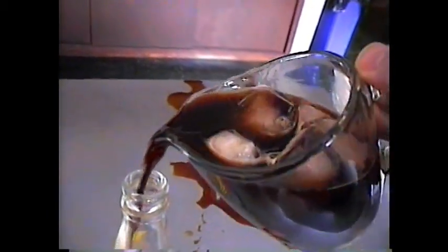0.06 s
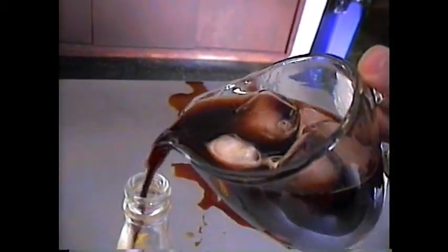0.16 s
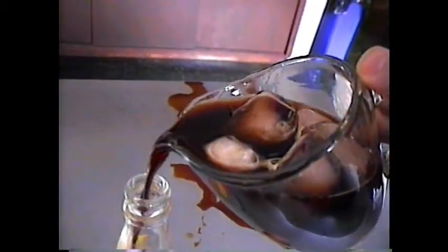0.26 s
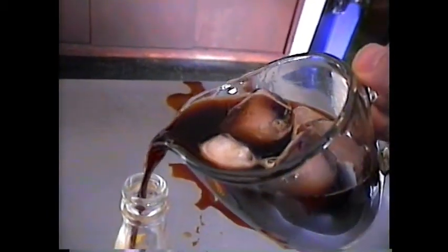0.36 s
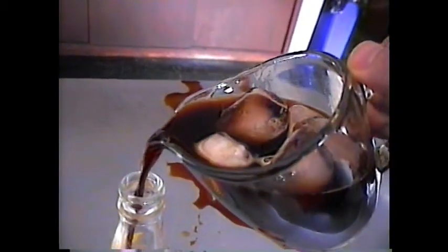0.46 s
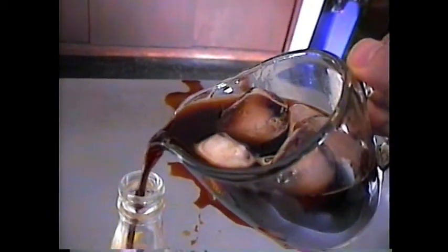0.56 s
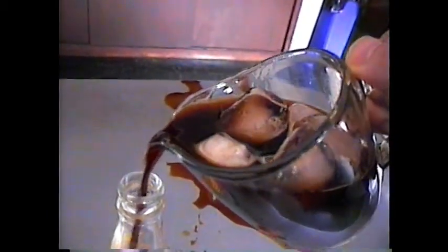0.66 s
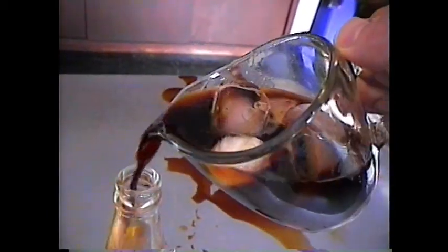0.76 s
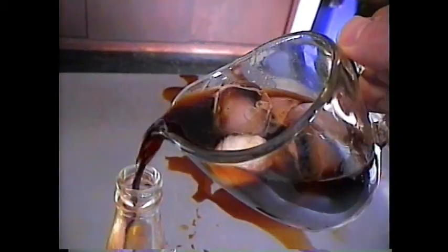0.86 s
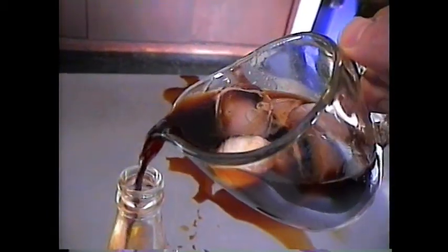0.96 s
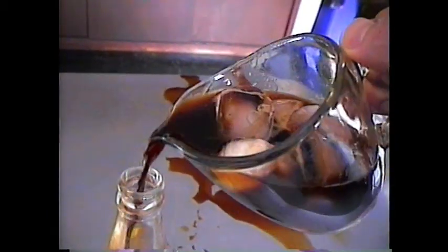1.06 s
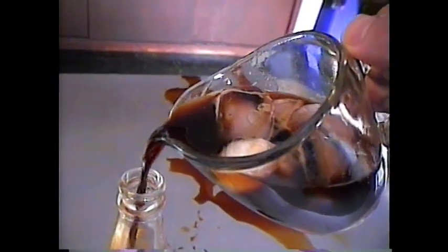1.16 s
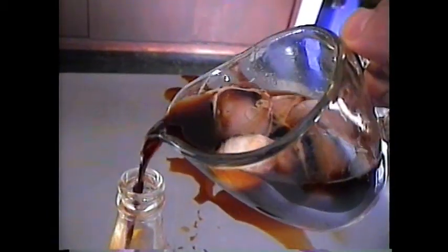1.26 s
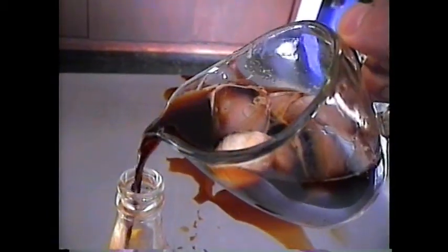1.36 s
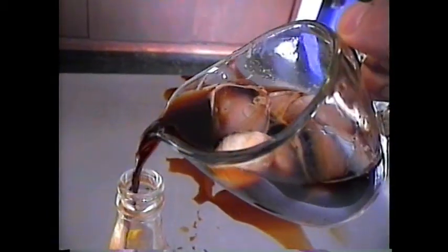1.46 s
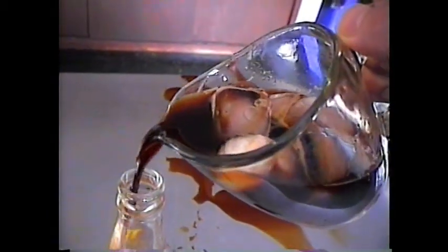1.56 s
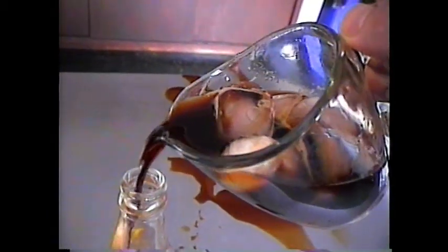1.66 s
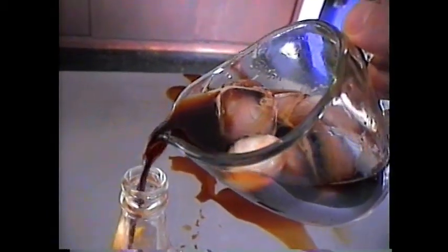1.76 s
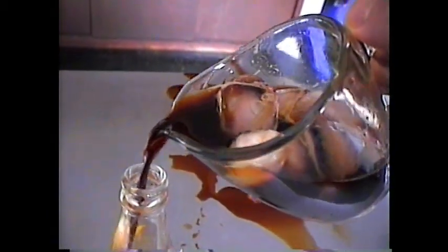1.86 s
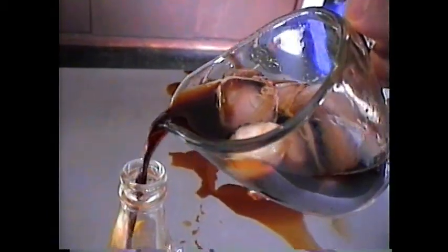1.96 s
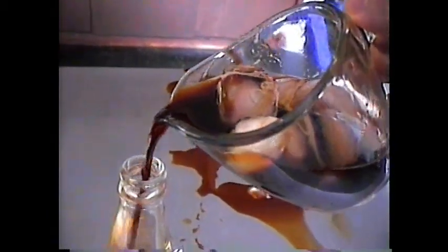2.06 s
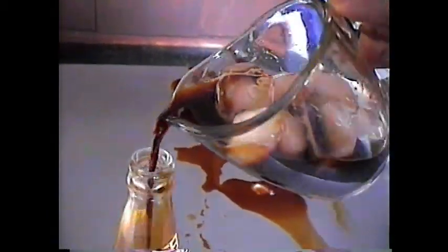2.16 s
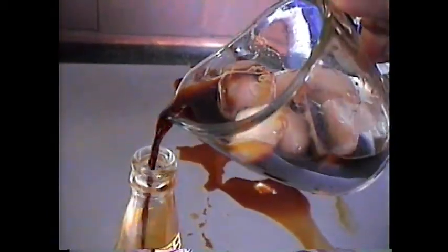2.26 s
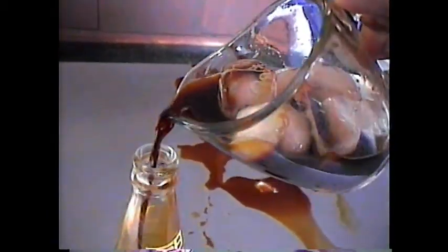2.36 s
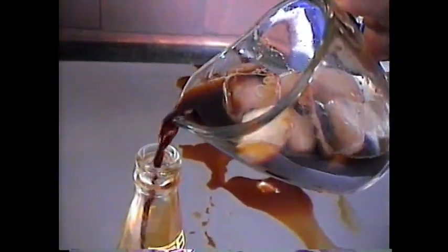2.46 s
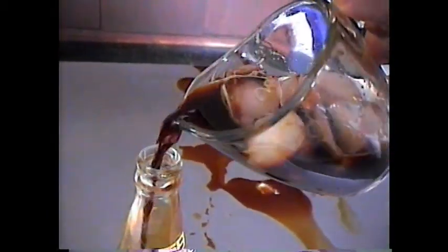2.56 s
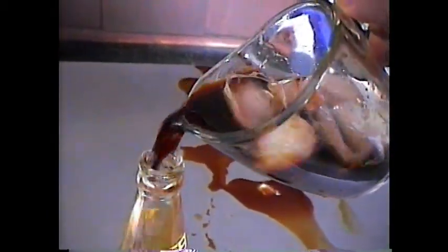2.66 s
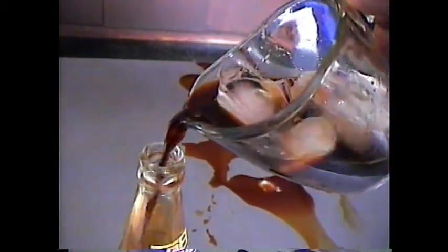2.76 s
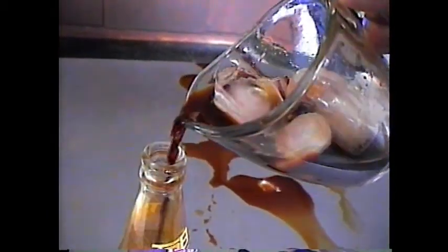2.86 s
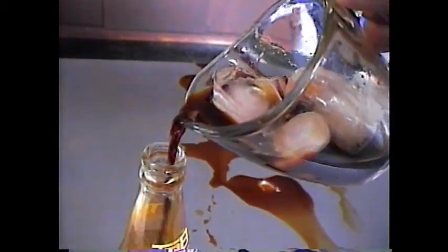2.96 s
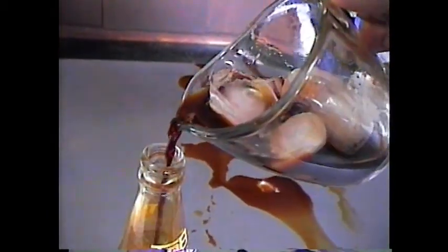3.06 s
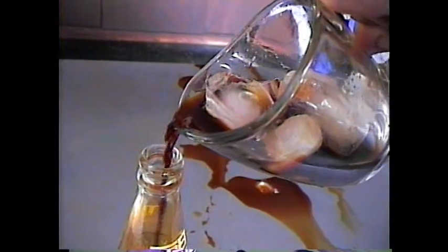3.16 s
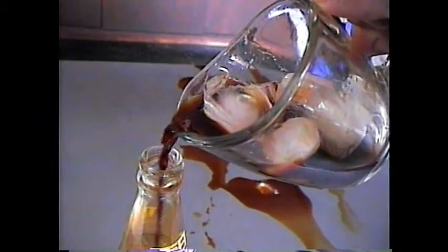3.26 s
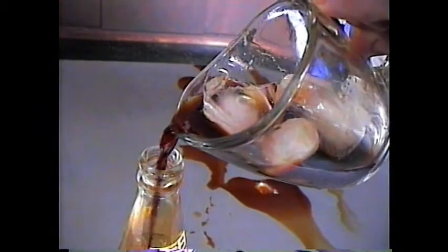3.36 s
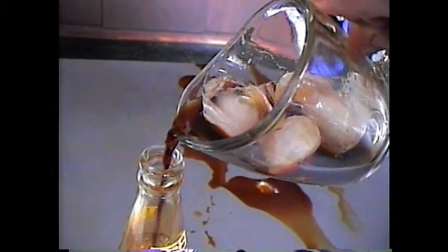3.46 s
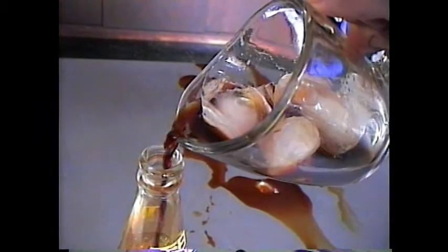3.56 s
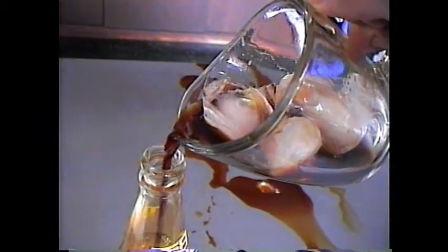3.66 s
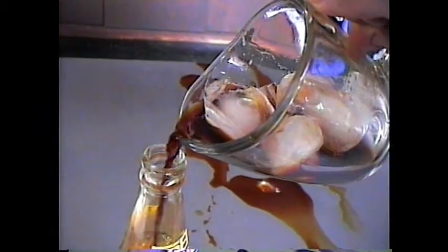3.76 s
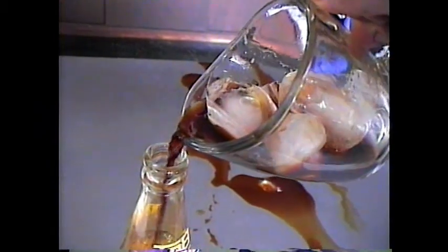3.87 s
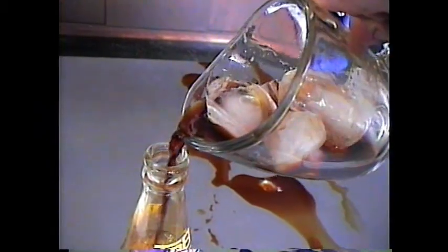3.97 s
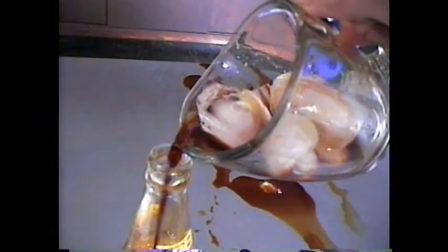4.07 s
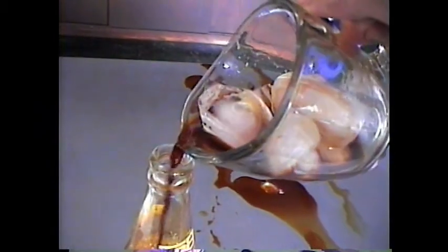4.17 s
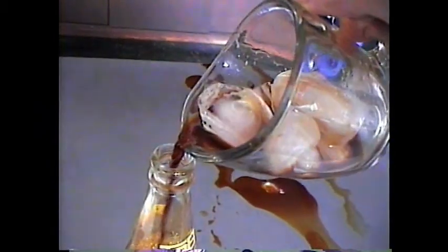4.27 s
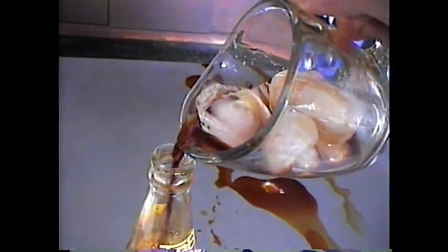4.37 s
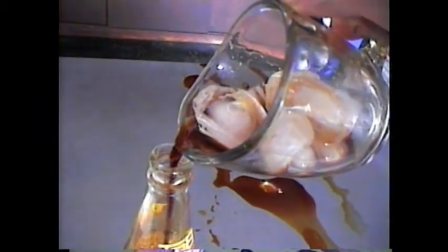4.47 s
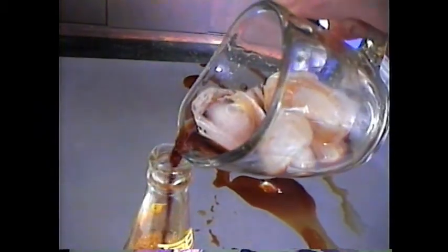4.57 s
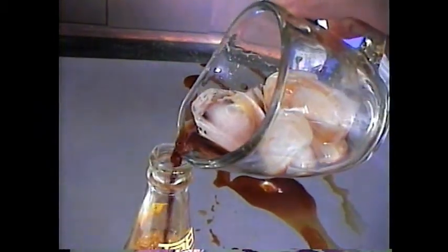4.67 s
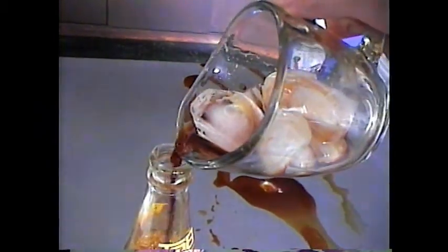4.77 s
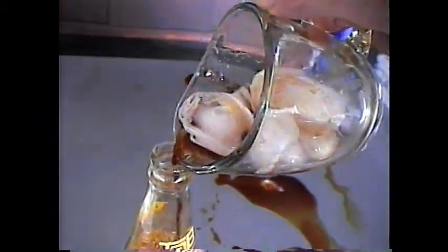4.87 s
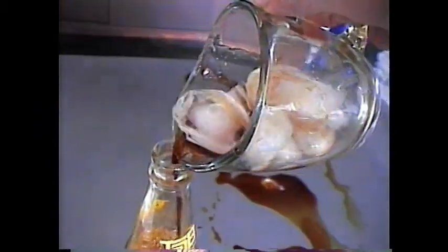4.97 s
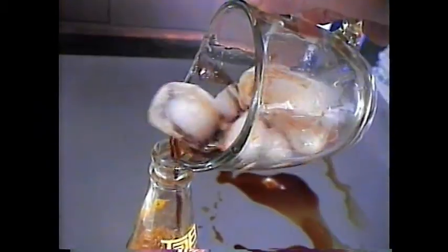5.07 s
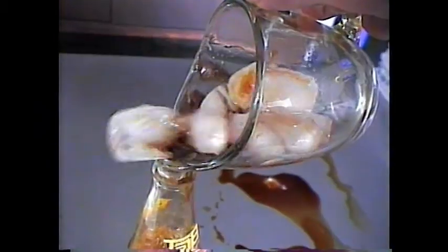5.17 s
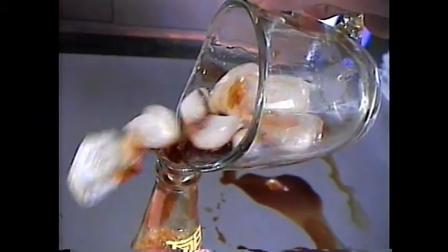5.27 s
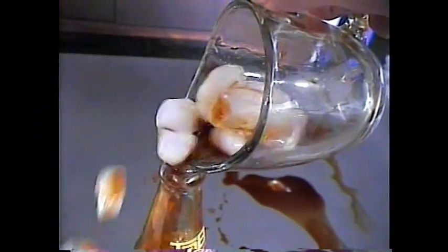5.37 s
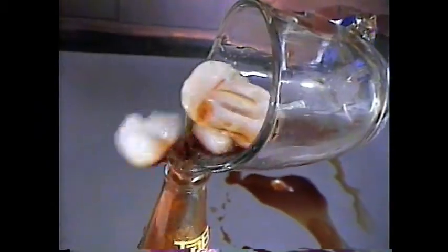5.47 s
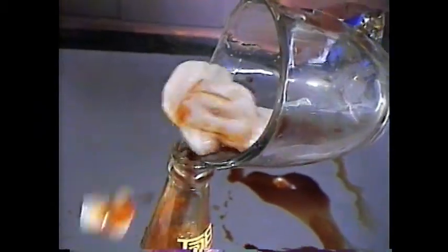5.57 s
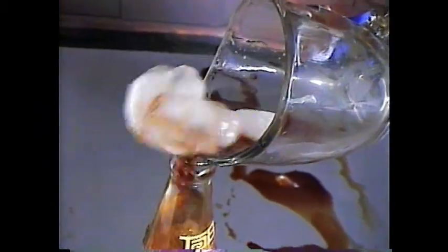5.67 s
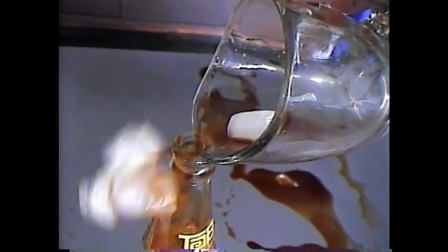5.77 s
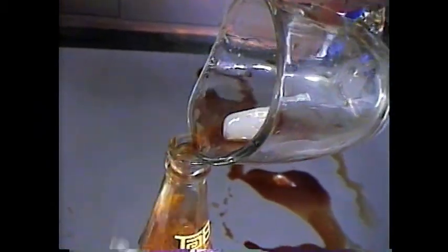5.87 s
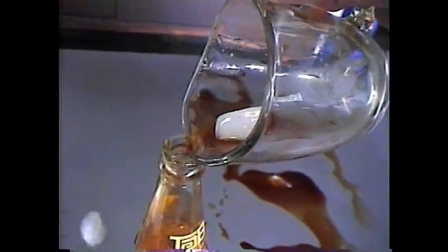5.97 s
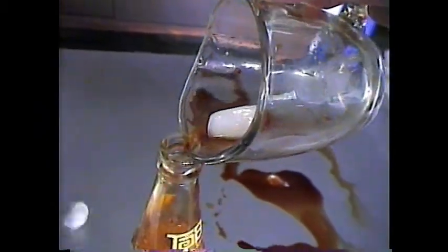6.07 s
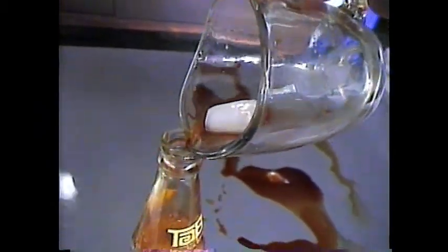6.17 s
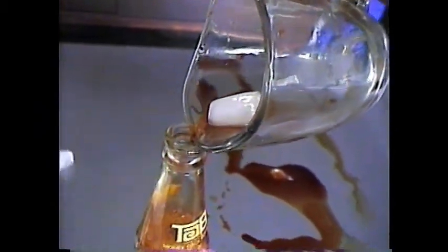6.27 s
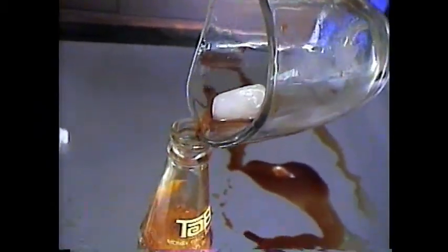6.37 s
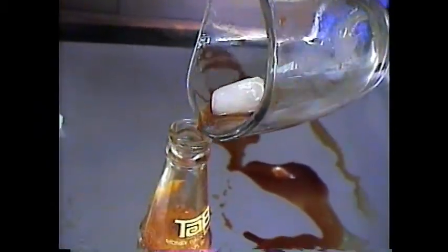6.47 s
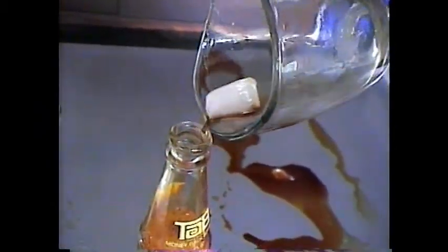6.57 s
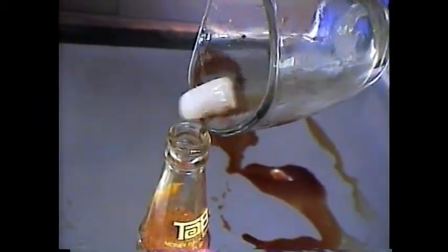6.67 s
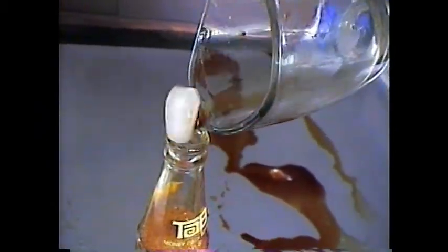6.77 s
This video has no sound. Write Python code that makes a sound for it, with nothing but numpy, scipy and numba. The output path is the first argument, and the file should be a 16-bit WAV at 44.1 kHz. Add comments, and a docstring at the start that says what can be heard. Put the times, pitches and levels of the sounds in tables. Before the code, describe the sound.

Close to the microphone, liquid pours from a glass pitcher into a narrow bottle, bubbling and plipping with a hollow note that creeps upward. The flow breaks briefly, resumes weaker and dwindles to a trickle, with a few ice clicks midway. Then ice rattles against the glass and cubes crash, skid and clink in a ringing steel sink. After a short gap the last ones land. A soft room drone lies underneath.

```python
"""In a softly droning room, iced tea pours from a glass pitcher into a narrow bottle close to the microphone.
The stream beats in bubbles that ring the bottle's air, its notes rising as it fills; gulps and gurgles follow.
Mid-pour, and again as the stream thins to a trickle, ice clicks against the pitcher's glass.
Then cubes skid, crash, bounce and clink in a ringing steel sink; after a pause the last ones land.
One close microphone feeds the left channel through a limiter; the right holds a faint leak and hiss."""
import sys
import numpy as np
from scipy import signal
from scipy.fft import rfft, irfft, next_fast_len
from scipy.io import wavfile
from scipy.ndimage import uniform_filter1d, minimum_filter1d, map_coordinates
from numba import njit

SR = 44100
rng = np.random.default_rng(int(sys.argv[2]) if len(sys.argv) > 2 else 0)


def put_to_file(sound):
    """Save the sound as 16-bit audio at rate SR, in the file named by the first command-line argument."""
    columns = np.atleast_2d(sound).T  # one column per channel
    safe = np.clip(columns, -1, 1)
    whole_steps = np.round(safe * 32767)
    wavfile.write(sys.argv[1], SR, whole_steps.astype(np.int16))


N = 300762
# source levels are set ahead of the doubling in scene() and the limiter in record()


def amp(db):
    """Decibels to gain."""
    return 10 ** (np.asarray(db) / 20)


def unit(x):
    """Scaled to rms 1."""
    return x / np.sqrt(np.mean(x ** 2) + 1e-20)


def along(points, hz):
    """(frequency [Hz], value) points read on a log frequency axis."""
    f, v = np.transpose(points)
    return np.interp(np.log(hz + 1), np.log(f + 1), v)


def curves(rows):
    """One value per sample for each column after the time."""
    s, *cols = np.transpose(rows)
    return [np.interp(np.arange(N) / SR, s, c) for c in cols]


def add(track, s, sound):
    """Mix a sound into a track at a time in seconds."""
    start = max(round(s * SR), 0)
    part = track[start:start + len(sound)]
    part += sound[:len(part)]


def coloured(x, gain, size=4096):
    """Causal minimum-phase filter with a gain that is a function of frequency."""
    cepstrum = irfft(np.log(np.maximum(gain(np.fft.rfftfreq(size, 1 / SR)), 1e-6)))
    # fold the cepstrum forward in time
    cepstrum[1:size // 2] *= 2
    cepstrum[size // 2 + 1:] = 0
    return signal.fftconvolve(x, irfft(np.exp(rfft(cepstrum))))[:len(x)]


def shaped(x, spectrum):
    """x through a (frequency [Hz], level [dB]) spectrum, at rms 1."""
    return unit(coloured(x, lambda hz: amp(along(spectrum, hz))))


def fade(t, t60):
    """Exponential decay that falls 60 dB in t60 seconds."""
    return np.exp(-np.log(1000) * t / t60)


def swell(t, rise):
    """Exponential onset with a time constant of rise seconds."""
    return 1 - np.exp(-t / rise)


def burst(t, rise, t60):
    """A short puff of noise."""
    return rng.standard_normal(len(t)) * fade(t, t60) * swell(t, rise)


def ring(modes, t):
    """Decaying modes (frequency [Hz], level [dB], t60 [s]), each struck at a random strength and phase."""
    tones = np.zeros(len(t))
    for hz, db, t60 in modes:
        strength = amp(db) * (.5 + rng.random())
        tones += strength * fade(t, t60) * np.sin(2 * np.pi * (hz * t + rng.random()))
    return tones * swell(t, rise=0.00034)  # a struck mode takes a moment to swell


def patter(rate, spread_db):
    """Random impulses of scattered size and sign, rate per second."""
    hits = rng.random(N) < rate / SR
    size = amp(spread_db * np.clip(rng.standard_normal(N), -2, 2))
    return hits * size * rng.choice([-1, 1], N)


@njit
def resonate(x, pole):
    """A resonance whose complex pole moves from sample to sample."""
    out, state = np.zeros(len(x)), 0j
    for i in range(len(x)):
        state = state * pole[i] + x[i]
        out[i] = state.imag
    return out


def air_mode(x, hz, width_hz):
    """One gliding air resonance, at rms 1."""
    return unit(resonate(x, np.exp(np.pi * (2j * hz - abs(width_hz)) / SR)))


def bubble(t, hz, cycles):
    """A bubble swells and rings, rising as it nears the surface; its t60 is given in cycles of hz."""
    life = cycles / hz
    rising = 1 + 0.091 * np.minimum(t / life, 1)
    return np.sin(2 * np.pi * hz * t * rising) * fade(t, life) * swell(t, rise=0.39 / hz)


def stream_ticks(kicks):
    """Each kick of the stream makes a bubble's tone and a noisy tick."""
    t = np.arange(SR // 30) / SR
    ticks = np.zeros(N)
    for i in np.flatnonzero(kicks):
        hz = min(5000 * np.exp(.5 * rng.standard_normal()), SR / 4)
        tick = bubble(t, hz, cycles=47) + 0.71 * burst(t, rise=0.00039, t60=0.02)
        add(ticks, i / SR, kicks[i] * tick)
    return ticks


# mean rate and level at full flow, dB per dB of flow, median pitch
STRAY_PER_S, STRAY_DB, STRAY_GROWS, STRAY_HZ = 14, -46.5, 0.31, 4170


def stray_plips(flow_db):
    """Other bubbles come by chance, more often and louder in a fuller stream; rows as in SINGLE_PLIPS."""
    at = np.flatnonzero(rng.random(N) < STRAY_PER_S * amp(flow_db / 2) / SR)
    size, pitch = rng.standard_normal((len(at), 2)).T
    level_db = STRAY_DB + STRAY_GROWS * flow_db[at] + 1.3 * size
    return list(zip(at / SR, level_db, STRAY_HZ * np.exp(.22 * pitch)))


# bubbles placed singly: (time [s], level before colouring [dB], starting pitch [Hz])
SINGLE_PLIPS = [(0.0311, -37, 2980), (0.094, -44.5, 3960), (0.155, -40, 3000), (0.2147, -35.5, 5430),
                (0.2928, -44, 3640), (0.3034, -37.5, 5300), (0.3631, -38, 4060), (0.397, -53, 3760),
                (0.413, -34, 3860), (0.437, -40, 3570), (0.4804, -39, 6300), (0.5185, -36.5, 7860),
                (0.573, -46, 3750), (0.649, -43.5, 3630), (0.7351, -48, 3000), (0.9824, -38, 5220),
                (1.175, -42.5, 4960), (1.8315, -43.5, 4960), (3.5123, -49.5, 3680), (3.945, -47.5, 4750),
                (4.2491, -51, 4600)]
NECK_DB = -44.5  # ring of the neck under one plip at full flow


def bubble_plips(flow_db, first_hz, second_hz):
    """Single and chance bubbles plip, ring the bottle's neck, and kick its air: one track for each."""
    t = np.arange(SR // 30) / SR
    plips, neck, kicks = np.zeros(N), np.zeros(N), np.zeros(N)
    for s, db, hz in SINGLE_PLIPS + stray_plips(flow_db):
        at = int(np.clip(round(s * SR), 0, N - 1))
        plip = 0.41 * bubble(t, hz, cycles=97) + 1.2 * burst(t, rise=0.00039, t60=0.017)
        add(plips, s, amp(db) * plip)
        neck_modes = [(first_hz[at], 0, .035), (second_hz[at], -2, .025)]
        add(neck, s, amp(NECK_DB + flow_db[at]) * ring(neck_modes, t))
        add(kicks, s, np.array([2.5]))
    return plips, neck, kicks


# level at full flow, and dB per dB of flow
NOTE_DB, NOTE_GROWS = -51.5, 0.88  # the hollow note
COLUMN_DB, COLUMN_GROWS = -55, 1.106  # the ring of the air column


def bottle_air(kicks, flow_db, note_hz, first_hz, second_hz):
    """Bubble kicks and steady noise drive the bottle's hollow note and two modes of its air column."""
    drive = unit(kicks) + .5 * rng.standard_normal(N)
    bright = np.diff(drive, prepend=0)
    # the heaving surface keeps detuning the air column
    slosh = 1 + 0.013 * map_coordinates(rng.standard_normal(N // 1000 + 4), [np.arange(N) / 1000])
    column = air_mode(bright, first_hz * slosh, width_hz=89)
    column = column - amp(-4.5) * air_mode(bright, second_hz * slosh, width_hz=230)
    hollow = air_mode(air_mode(drive, note_hz, width_hz=42), note_hz, width_hz=41)
    column_level = amp(COLUMN_DB + COLUMN_GROWS * flow_db)
    return column_level * column + amp(NOTE_DB + NOTE_GROWS * flow_db) * hollow


# the stream runs full, falters, then thins to a trickle: (time [s], flow level [dB])
STREAM_FLOW = [(0, -0.5), (.26, -2), (.32, -1.5), (.735, 0), (.76, -27), (.88, -16.5), (.97, -5.5),
               (1.68, -8), (1.78, -13.5), (2.04, -6), (2.26, -19.5), (2.75, -12.5), (2.95, -21.5),
               (3.9, -18.5), (5.05, -28.5), (5.5, -28)]
# air in the bottle: (time [s], hollow note [Hz], first column mode [Hz], second column mode [Hz])
BOTTLE_AIR = [(0, 233, 1380, 2300), (.35, 242, 1442, 2330), (.74, 247, 1500, 2470), (1.1, 258, 1645, 2640),
              (2.1, 268.5, 1674, 2990), (5, 290, 1869, 3204)]
# colour of the bubbles: (frequency [Hz], level [dB])
BUBBLE_COLOUR = [(100, -6), (700, 5), (1100, -2.5), (1900, -1), (4000, 0), (5300, 2), (6000, -2),
                 (7500, -2), (9500, -8), (12500, -22), (14500, -50)]
FIZZ_DB, FIZZ_GROWS = -58.5, 0.7  # the stream's ticks at full flow; dB per dB of flow


def pour():
    """The stream beats bubbles into the tea; each one ticks and rings the air above it."""
    flow_db, = curves(STREAM_FLOW)
    note_hz, first_hz, second_hz = curves(BOTTLE_AIR)
    kicks = patter(rate=380, spread_db=4.5)
    ticks = stream_ticks(kicks)
    plips, neck, plip_kicks = bubble_plips(flow_db, first_hz, second_hz)
    fizz = amp(FIZZ_DB + FIZZ_GROWS * flow_db) * shaped(ticks, BUBBLE_COLOUR)
    plips = coloured(plips, lambda hz: amp(along(BUBBLE_COLOUR, hz)))
    air = bottle_air(kicks + plip_kicks, flow_db, note_hz, first_hz, second_hz)
    return fizz + plips + neck + air


# colour of the room's drone: (frequency [Hz], level [dB])
ROOM_COLOUR = [(25, -11), (75, -18), (115, -7), (180, -6), (250, 2.5), (305, -3.5), (348, 4), (440, -16),
               (505, -3), (640, -16), (1800, -19), (3000, -28.5), (12500, -40.5), (14500, -68)]


def room_drone():
    """The soft drone of the room is steady coloured noise."""
    return amp(-58.5) * shaped(rng.standard_normal(N), ROOM_COLOUR)


def whine():
    """A faint electronic whine is one steady high sine."""
    return amp(-90.5) * unit(np.sin(2 * np.pi * 8570 * np.arange(N) / SR))


# gulps of trapped air: (time [s], level [dB], pitch [Hz])
AIR_GULPS = [(.105, -32, 239.3), (.297, -33.5, 244), (.372, -33, 246.4), (0.463, -30.5, 252),
             (1.665, -37, 262), (2.784, -34, 304), (2.842, -42, 360), (3.179, -41, 294)]


def gulps():
    """Pockets of trapped air swing the bottle's hollow note as short decaying sines."""
    out, t = np.zeros(N), np.arange(SR // 5) / SR
    for s, db, hz in AIR_GULPS:
        add(out, s, amp(db) * np.sin(2 * np.pi * hz * t) * fade(t, t60=.11) * swell(t, rise=0.0075))
    return out


# runs of like bubbles: (time [s], length [s], bubbles per second [1/s], middle level [dB], middle pitch [Hz])
BUBBLE_RUNS = [(1.501, 0.063, 330, -52, 1370), (2.483, 0.066, 185, -56, 4640),
               (2.546, .14, 81, -50.5, 1286), (2.554, 0.13, 95, -51.5, 2970),
               (2.807, 0.039, 430, -55.5, 8800), (3.498, 0.57, 50, -61, 677),
               (4.002, 0.29, 26, -55.5, 3350), (4.498, 0.7, 30, -56, 3300)]


def gurgles():
    """Bubbles come in runs, scattered in time, level and pitch."""
    out, t = np.zeros(N), np.arange(SR // 5) / SR
    for s, length, rate, db, hz in BUBBLE_RUNS:
        for when in np.arange(0, length, 1 / rate):
            start = s + when + rng.random() / rate
            level = amp(db + rng.normal(0, 4.8))
            add(out, start, level * bubble(t, hz * np.exp(rng.normal(0, 0.052)), cycles=24.7))
    return out


KNOCK_DB, KNOCK_DB_PER_OCTAVE = -4.5, -13.5  # dull knock in a 2 kHz click; sharper contacts have less


def ice_contact(t, pitch_hz):
    """Ice on glass: a snap of noise around the pitch, a ringing tone and a dull knock, at peak 1."""
    contact = burst(t, rise=0.00077, t60=0.0067)

    def snap_gain(hz):
        peak = 1 / (1 + (np.log((hz + 1) / pitch_hz) / 0.5) ** 2)
        return peak / (1 + (hz / 10500) ** 12) / (1 + (hz / (4.5 * pitch_hz)) ** 3)

    def knock_gain(hz):
        return 1 / (1 + (np.log((hz + 1) / 950) / 0.78) ** 4) / (1 + (hz / 5000) ** 4)

    knock_db = KNOCK_DB + KNOCK_DB_PER_OCTAVE * np.log2(pitch_hz / 2000)
    hit = unit(coloured(contact, snap_gain)) + 0.68 * unit(bubble(t, pitch_hz, cycles=34))
    hit = hit + amp(knock_db) * unit(coloured(contact, knock_gain))
    return hit / np.abs(hit).max()


# ice knocking in the pitcher: (time [s], contact peak level [dB], pitch [Hz])
ICE_CLICKS = [(2.551, -43.5, 1730), (2.593, -40, 1970), (2.628, -37.5, 3640), (2.784, -39.5, 3130),
              (5.037, -44.5, 2602), (5.062, -31.5, 4500), (5.118, -29, 1730), (5.14, -31, 2100),
              (5.181, -24.5, 3560), (5.227, -38, 2280), (5.237, -22, 2850), (5.256, -23, 1974),
              (5.292, -33.5, 2120), (5.331, -31, 2320), (5.345, -23, 3100), (5.38, -21.5, 3500),
              (5.41, -19.5, 2680), (5.425, -22, 2640), (5.443, -22, 1790), (5.481, -31, 2470)]
# modes of the pitcher's glass: (frequency [Hz], relative level [dB], t60 [s])
PITCHER_GLASS = [(2000, 9, 0.015), (2410, 6, 0.056), (3860, 10, 0.017), (4300, -6, 0.028), (5610, 3, 0.022),
                 (7500, -15, .03)]
# air in the emptying pitcher: (time [s], pitch [Hz])
PITCHER_AIR = [(5.05, 984), (5.25, 926), (5.45, 864)]


def ice_clicks():
    """Wet ice snaps against the glass and chatters on; the pitcher and its air ring faintly."""
    out, t = np.zeros(N), np.arange(SR // 4) / SR
    for s, db, pitch_hz in ICE_CLICKS:
        hit = ice_contact(t, pitch_hz)
        air = ring([(np.interp(s, *np.transpose(PITCHER_AIR)), -17, .085)], t)
        glass = amp(-23) * ring(PITCHER_GLASS, t)
        inside = coloured(burst(t, rise=0.0023, t60=0.33), lambda hz: 1 / (1 + (hz / 3800) ** 3))
        add(out, s, amp(db) * (hit + glass + air + amp(-20.0) * inside))
        # three lighter touches scatter closely around the click
        for delay, touch_db in zip(rng.uniform(-0.012, .018, size=3), rng.normal(-17.0, 1.8, size=3)):
            add(out, s + delay, amp(db + touch_db) * hit)
    return out


# decay of the sink's dense ring: (frequency [Hz], t60 [s])
DENSE_RING_T60 = [(200, 0.47), (1000, 0.34), (3500, 0.64), (10000, 0.78)]


def dense_ring(t):
    """Countless close modes as noise, each band dying at its own speed."""
    hz, when, z = signal.stft(rng.standard_normal(len(t)), SR, nperseg=256)
    decay = fade(when, along(DENSE_RING_T60, hz)[:, None])
    return unit(signal.istft(z * decay, SR, nperseg=256)[1][:len(t)])


# strong modes of the steel sink: (frequency [Hz], relative level [dB], t60 [s])
SINK_MODES = [(267.4, -0.5, 0.53), (355.5, -3.5, 0.48), (524, -9.5, 0.55), (910, -8, 0.3), (1098, -2, 0.24),
              (1341, -5, 0.26), (1530, 0, 0.22), (1580, -0.5, 0.25), (2344, 0.5, 0.28), (2606, 1, 0.34),
              (2784, -1, 0.3), (3564, -1.5, 0.41), (3819, 1, 0.42), (5306, 0, .35)]


def sink_ring(t, body):
    """The sink's ring: its shared body, a dense ring drawn anew at each call, and a few strong modes."""
    return unit(0.72 * body + dense_ring(t) + amp(-13.0) * unit(ring(SINK_MODES, t)))


def slide(s, length, t60):
    """A slide's envelope: quick rise, hold, and a dying ring."""
    age = np.arange(N) / SR - s
    return np.clip(age / 0.017, 0, 1) * fade(np.maximum(age - length, 0), t60)


# slides of ice and splashed tea: (time [s], length [s], rattle level [dB], spray level [dB])
SLIDES = [(5.519, 0.034, -23, -24.5), (5.739, .015, -26.5, -33.5), (5.793, .055, -34, -30),
          (5.984, 0.018, -37.5, -34), (6.026, 0.044, -29, -29.5), (6.174, 0.067, -31.5, -28.5),
          (6.3, 0.058, -43.5, -33)]
# colour of the rattling ice: (frequency [Hz], level [dB])
ICE_RATTLE_COLOUR = [(50, -23.5), (170, -4), (290, -1.5), (350, 2.5), (430, -1), (700, -5), (1500, -3.5),
                     (2700, -7.5), (4000, -17), (7000, -33)]
# colour of the spray: (frequency [Hz], level [dB])
TEA_SPRAY_COLOUR = [(800, -32), (2500, 1), (4000, 0.5), (6500, -4), (9500, -6), (12000, -19), (15000, -51)]


def skid(t, body):
    """Cubes chatter across the ringing sink in a spray of tea and ice chips."""
    # overlapping slides add in power
    rattle_level = np.linalg.norm([amp(db) * slide(s, length, t60=0.47) for s, length, db, _ in SLIDES], axis=0)
    spray_level = np.linalg.norm([amp(db) * slide(s, length, t60=.48) for s, length, _, db in SLIDES], axis=0)
    chatter = signal.fftconvolve(patter(rate=150, spread_db=6.5), sink_ring(t, body))[:N]
    droplets = unit(patter(rate=2500, spread_db=1.5)) + rng.standard_normal(N)
    rattle = shaped(chatter, ICE_RATTLE_COLOUR)
    return rattle_level * rattle + spray_level * shaped(droplets, TEA_SPRAY_COLOUR)


# cubes striking the sink, landings and hard rebounds alike: (time [s], rms level of first 20 ms [dB],
# brightness limit [Hz], flight to first bounce [s])
SINK_HITS = [(5.521, -32, 11200, 0.024), (5.538, -19.5, 11400, .018), (5.584, -23, 5270, .03),
             (5.602, -23, 5300, 0.033), (5.726, -29, 2740, 0.036), (5.988, -33.5, 9100, 0.078),
             (6.007, -25.5, 2370, 0.022), (6.105, -31, 4100, 0.031), (6.175, -31, 11500, .035),
             (6.264, -34.5, 4030, .03), (6.334, -35, 6000, 0.033), (6.6565, -26, 3980, 0.068),
             (6.802, -35, 2830, 0.013)]
# colour of a blow on the sink, before its brightness limit: (frequency [Hz], level [dB])
BLOW_COLOUR = [(40, -12.5), (150, -20), (290, -6), (380, -3.5), (700, -2), (1500, 1), (2700, -1.5),
               (4500, -1.5), (6500, -5.5), (9500, -11), (12000, -18), (15000, -36)]
BOUNCE_LOSS_DB, BOUNCE_SHRINK = 8.5, .8  # each bounce is weaker, each flight shorter
THUD_DB = -34  # the sink gives under each hit


def crashes(t, body):
    """Each cube cracks onto the steel, sets it ringing, thuds and bounces; blunt hits are duller."""
    out = np.zeros(N)
    for s, db, limit_hz, flight in SINK_HITS:
        add(out, s, amp(THUD_DB) * np.sin(2 * np.pi * 36 * t) * fade(t, t60=0.051))

        def blow_gain(hz):
            return amp(along(BLOW_COLOUR, hz)) * (1 / (1 + (hz / limit_hz) ** 8) + 0.11)

        for k in range(3):  # the hit and two bounces
            blow = sink_ring(t, body) + 0.53 * unit(burst(t, rise=0.0013, t60=0.026))
            blow = coloured(blow, blow_gain)
            add(out, s, amp(db - k * BOUNCE_LOSS_DB) * blow / np.std(blow[:SR // 50]))
            s = s + flight * BOUNCE_SHRINK ** k
    return out


# cubes clinking amid the crash: (time [s], level [dB], pitch [Hz])
CUBE_CLINKS = [(5.654, -18.5, 2680), (5.724, -16, 2480), (5.731, -24, 1066), (6.66, -19, 1145),
               (6.665, -24, 770), (6.805, -31, 1020)]


def clinks(t):
    """Cubes clink, each clink two short modes."""
    out = np.zeros(N)
    for s, db, hz in CUBE_CLINKS:
        add(out, s, amp(db) * ring([(hz, 0, .05), (hz * 0.87, -4, .04)], t) * swell(t, rise=0.0017))
    return out


def scene():
    """Everything reaches one close microphone on the left; the right gets a faint leak of it and hiss."""
    t = np.arange(SR // 2) / SR
    body = dense_ring(t)  # shared by every blow on the sink
    mic = room_drone() + whine() + pour() + gulps() + gurgles() + ice_clicks()
    mic = mic + crashes(t, body) + clinks(t) + skid(t, body)
    hiss_colour = [(30, 6.0), (300, -16.0), (3000, -24.5), (11000, -14.5), (14000, -51)]
    hiss = amp(-85.0) * shaped(rng.standard_normal(N), hiss_colour)
    return np.array([2 * mic, amp(-66) * mic + hiss])


def record(dry):
    """A limiter driven by the left channel holds peaks down on both; nothing passes above 15 kHz."""
    needed = np.minimum(1, amp(-10.0) / (np.abs(dry[0]) + 1e-9))
    gain = uniform_filter1d(minimum_filter1d(needed, size=257), size=129)
    size = next_fast_len(N + SR // 4)
    passed = np.fft.rfftfreq(size, 1 / SR) < 15000
    return irfft(rfft(dry * gain, size) * passed, size)[:, :N]


dry = scene()
out = record(dry)
put_to_file(out)
```